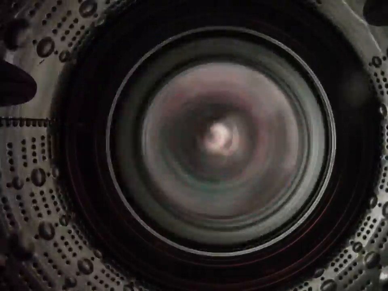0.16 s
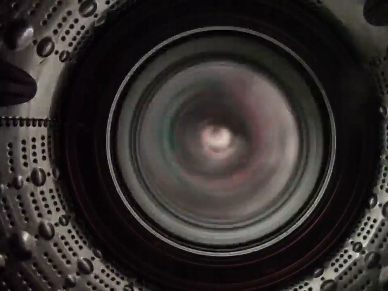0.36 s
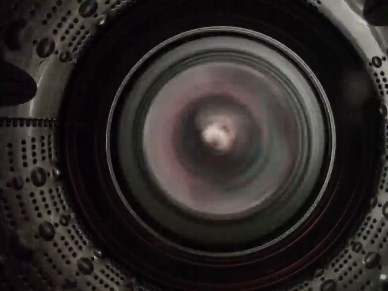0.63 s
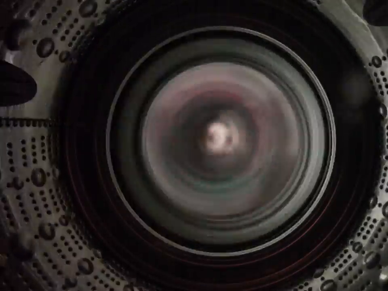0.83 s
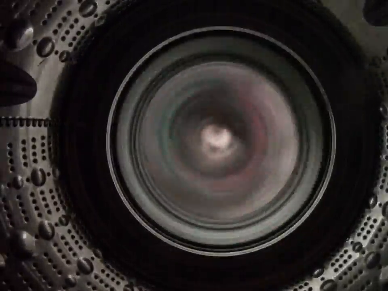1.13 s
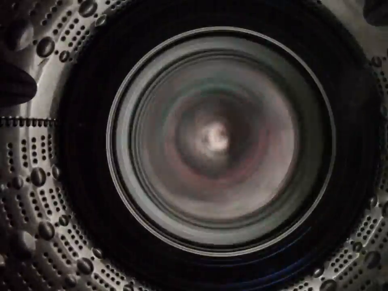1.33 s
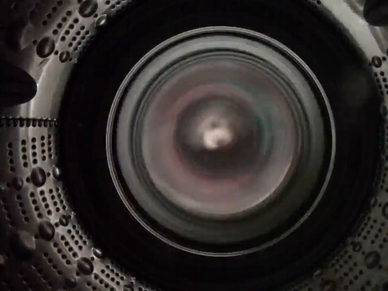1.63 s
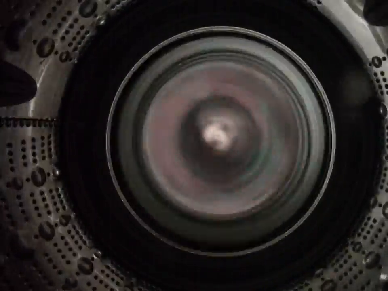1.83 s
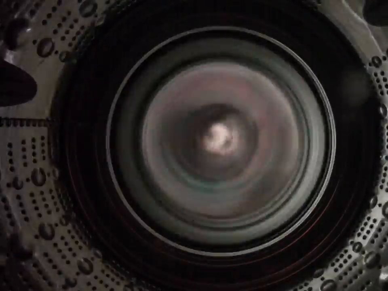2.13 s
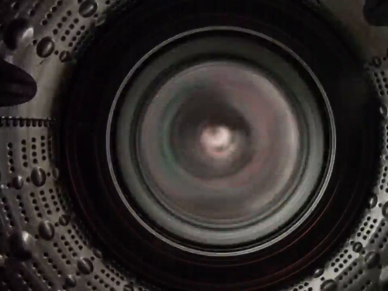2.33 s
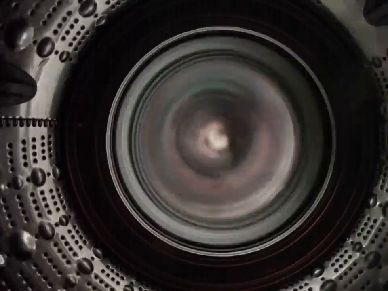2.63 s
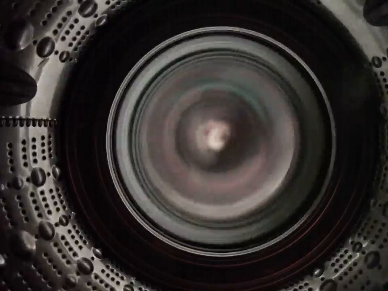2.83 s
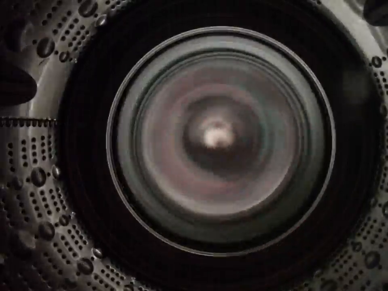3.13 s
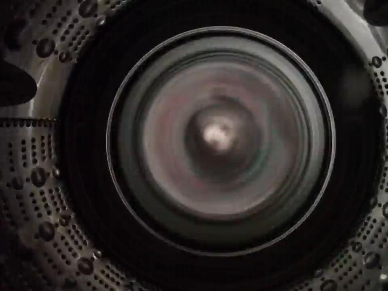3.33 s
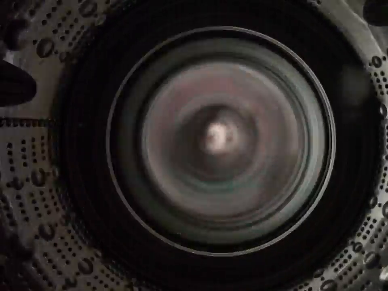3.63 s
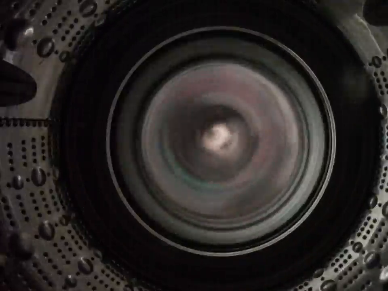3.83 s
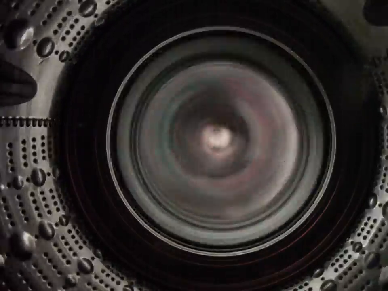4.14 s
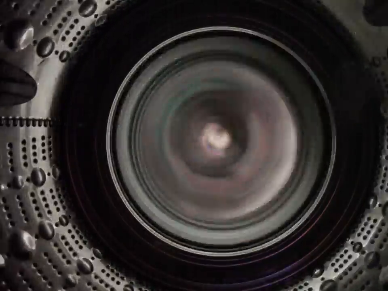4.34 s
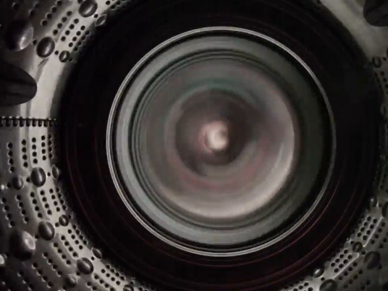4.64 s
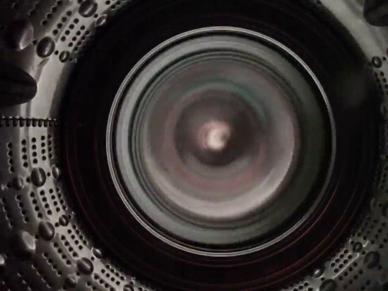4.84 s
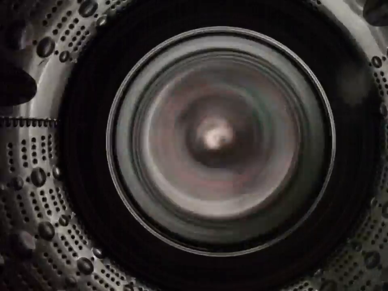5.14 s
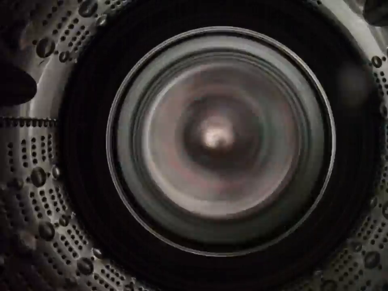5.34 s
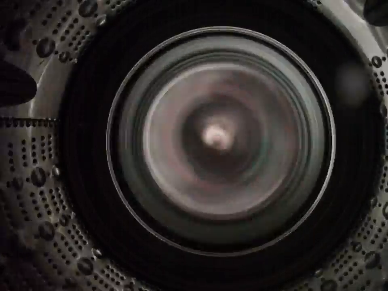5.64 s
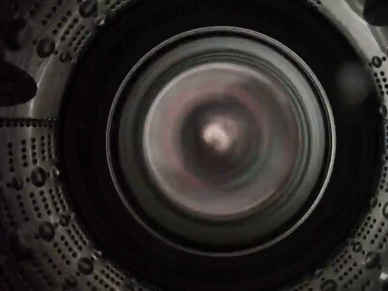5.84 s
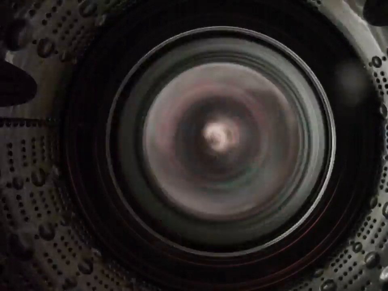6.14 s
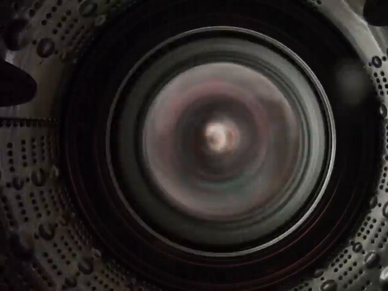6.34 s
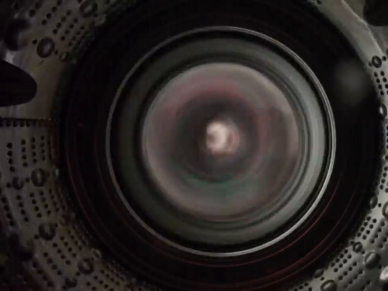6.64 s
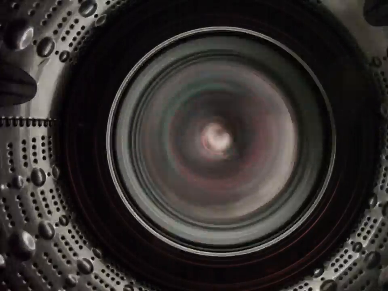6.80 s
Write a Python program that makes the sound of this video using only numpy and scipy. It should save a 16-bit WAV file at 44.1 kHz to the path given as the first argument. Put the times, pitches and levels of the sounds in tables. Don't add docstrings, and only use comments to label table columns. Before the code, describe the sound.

A washing machine drum is already spinning fast and slowly gaining speed, heard by a small microphone fixed inside. A heavy bass rumble flutters nine to ten times a second with dull tub thuds. A motor hum near 320 hertz and a fainter whine above it creep upward. Air rushes with a hollow metallic ring, and tiny water spatters tick now and then.

```python
import sys
import numpy as np
from scipy import signal
from scipy.fft import rfft, irfft
from scipy.io import wavfile
from scipy.ndimage import uniform_filter1d

SR = 44100
rng = np.random.default_rng(int(sys.argv[2]) if len(sys.argv) > 2 else 0)


def to_linear_factor(level_db):
    exponent = np.asarray(level_db, float) / 20
    return 10 ** exponent


def wav_record(signal):
    frames = np.transpose(np.atleast_2d(signal))
    bounded = np.clip(frames, -1, 1)
    quanta = np.round(bounded * 32767).astype(np.int16)
    wavfile.write(sys.argv[1], SR, quanta)


N = 307377
T = np.arange(N) / SR
HZ = np.arange(N // 2 + 1) * SR / N + 1e-3

# f/Hz, level/dB per Hz
AIR_RUSH = [(10, -83), (22, -74.5), (40, -63), (120, -61.5), (250, -67.5), (405, -71), (860, -86.5),
            (1500, -71.5), (2700, -83), (4400, -92), (6500, -101), (9000, -111), (11500, -113),
            (12700, -117), (15200, -121), (22050, -125)]
# f/Hz, level/dB rms
WHISTLES = [
    (14099, -104),
    (14739, -90.5),
]
# f/Hz, width/Hz, level/dB per Hz
PANEL_CABINET_MODES = [(62, 10, -51),
                       (99.5, 6.2, -48), (202.8, 55, -59), (235, 14, -61), (275.3, 7.9, -58.5), (314.6, 65, -55)]
# f/Hz, width/Hz, level/dB per Hz
SHELL_MODES = [(445.4, 19, -64), (525, 118, -65), (711, 212, -72.5), (947, 63, -71), (1047.4, 43, -63.5),
               (1157, 188, -68), (1404, 200, -66.5), (1543, 120, -70.5), (1693, 74, -70), (1818, 26, -65.5),
               (1872, 110, -68), (2068, 350, -70), (2308, 198, -72.5), (3203, 54, -80.5), (3645, 660, -89),
               (5000, 360, -90), (5600, 220, -95.5), (6350, 140, -99), (14100, 100, -116),
               (14760, 90, -113), (14500, 500, -117)]
# t/s, splash level/dB, mist level/dB, fade/s
FLUNG_DROPS = [(.05, -65, -72, 0.047), (1.285, -68, -80, 0.055), (2.8, -73, -78, 0.044),
               (3.231, -52, -59, 0.029), (3.363, -60, -81, 0.018), (3.47, -73, -78, 0.054),
               (4.024, -56, -67, .03), (5.03, -61, -81, 0.026), (5.75, -71, -79, 0.035),
               (5.992, -58, -74, 0.025), (6.36, -72, -69, 0.034)]
# f/Hz, level/dB per Hz
SPLASH_COLOUR = [(2000, -30), (4500, 0), (8500, -2), (10500, -20), (16000, -50)]
MIST_COLOUR = [(7000, -30), (9500, 0), (12400, 0), (13600, -18), (16000, -35)]

# top level/dB, f/Hz, width/Hz
SLOT_MULTIPLES = [32, -33, -34, -35, 36, 37, 38]
SLOT_PEAKS = [(-49, 291.8, 35.3), (-40, 300.9, 18.7), (-36.5, 312.3, 11), (-31.5, 315.2, 28),
              (-25, 307.2, 29.2), (-35.5, 348.6, 32.6), (-49, 347.4, 20)]
# multiples; top level/dB, f/Hz, width/Hz
WHINE_MULTIPLES = [-71, 72, -73, 74, 108, 143, 144, 145]
WHINE_PEAKS = [(-54.5, 570, 180), (-50, 626, 170), (-53.5, 740, 98), (-61, 714, 58), (-44.5, 1080, 39),
               (-55, 1382, 64), (-44, 1313, 100), (-52.5, 1388, 56)]
# multiples; top level/dB, f/Hz, width/Hz
BETWEEN_MULTIPLES = [-5.552, 6.552, 7.552]
BETWEEN_PEAKS = [
    (-41.5, 54.0, 4.1),
    (-28.5, 73, 57),
    (-29.9, 68.2, 9.8),
]
# t/s, level/dB
BETWEEN_SURGES = [(0, -3), (.7, 0), (1.1, 2), (1.6, -4.5), (2.2, -13), (2.8, 5.5), (3.1, -9), (3.4, 4.5),
                  (4, -8.5), (4.6, 5.5), (5.2, -10.5), (5.8, -2.5), (6.4, 3), (6.97, 4)]
# multiples; top level/dB, f/Hz, width/Hz
THUD_MULTIPLES = [14, 15, 16, 17, 18]
THUD_PEAKS = [(-13.5, 128.7, 22), (-4.5, 143.4, 8.8), (6.0, 161.8, 11.9), (0.5, 171.5, 17), (-7, 163.0, 12)]
# f/Hz, width/Hz, level/dB per Hz over the blow
TUB_MODES = [(155, 28, -23)]
# t/s, extra level/dB
HARD_LANDINGS = [(.04, -2.5), (.49, 3), (1.04, 6), (1.36, 7.5), (1.59, 2.5), (1.8, 8), (2.99, 2), (3.1, 3),
                 (3.92, 10), (4.15, 5), (5.08, 0), (5.91, 1), (6.31, 1), (6.81, 4)]
# multiples; top level/dB, f/Hz, width/Hz
KNOCK_MULTIPLES = [23, 25, 28, 29, 30, 47]
KNOCK_PEAKS = [(-41.5, 207.3, 22), (-47.5, 235.3, 12.3), (-46, 272.6, 12), (-49.5, 271.3, 10),
               (-36.5, 306.8, 34.6), (-50.5, 442, 88)]
# top level/dB, f/Hz, width/Hz
SWAY_PEAKS = [(-28.5, 10, 4.7), (-36.5, 30.1, 4.6)]
ROCK_PEAKS = [(-37, 39.5, 9), (-29.5, 48.9, 3.4)]
# multiples; top level/dB, f/Hz, width/Hz
LOAD_MULTIPLES = [6, 7, -8, -9, -10, -11, 12, 13]
LOAD_PEAKS = [(-19, 58.8, 4.5), (-20.3, 64.6, 41), (-42, 75.3, 11), (-40, 88.3, 5.2), (-39, 94.4, 8),
              (-44.5, 102.4, 8), (-49.5, 140, 48), (-48, 126.6, 13)]
# t/s, speed/turns per s
DRUM_SPEED = [
    (0, 8.981),
    (6.97, 9.881),
]


def curves(table):
    s, *columns = np.transpose(table)
    return [np.interp(T, s, c) for c in columns]


def noise(power):
    return irfft(rfft(rng.standard_normal(N)) * np.sqrt(power * SR / 2), N)


def sloped(points):
    hz, db = np.transpose(points)
    return to_linear_factor(np.interp(np.log(HZ), np.log(hz), db)) ** 2


def walk(rate):
    k = int(SR / rate)
    held = np.repeat(rng.standard_normal(N // k + 1), k)
    return 1.87 * uniform_filter1d(uniform_filter1d(held, k), k)[:N]


def ringing(modes, flicker_db):
    out = np.zeros(N)
    for hz, width, db in modes:
        skirt = (1 + (2 * (HZ - hz) / width) ** 2) ** 2
        out += to_linear_factor(flicker_db * walk(6)) * noise(to_linear_factor(db) ** 2 / skirt)
    return out


def tone(turn, multiple, db, lead):
    wave = np.cos(2 * np.pi * (abs(multiple) * turn + lead))
    return np.sign(multiple) * np.sqrt(2) * to_linear_factor(db) * wave


def multiples(turn, speed, at, peaks, wander_db, lead=0):
    out = np.zeros(N)
    for k, (db, hz, width) in zip(at, peaks):
        off_peak = 1 + (2 * (abs(k) * speed - hz) / width) ** 2
        out += tone(turn, k, db + wander_db * walk(3), lead) / off_peak
    return out


def door_sweep(turn):
    return np.cos(2 * np.pi * (turn - .86))


def air(turn, faster):
    level_db = -2.68 + 4 * faster + 0.77 * door_sweep(turn) + 0.62 * walk(8)
    return noise(sloped(AIR_RUSH)) * to_linear_factor(level_db)


def whistle():
    return sum(np.sqrt(2) * to_linear_factor(db + 3 * walk(30)) * np.sin(2 * np.pi * hz * T) for hz, db in WHISTLES)


def cabinet(turn):
    flex = np.cos(4 * np.pi * (turn - .17))
    return ringing(PANEL_CABINET_MODES, .5) * to_linear_factor(-0.5 + 2.5 * flex)


def shell(turn, faster):
    level_db = -0.2 + 2 * faster + 0.38 * door_sweep(turn) + 0.25 * walk(9)
    return ringing(SHELL_MODES, 0.89) * to_linear_factor(level_db)


def drops():
    splash, mist = noise(sloped(SPLASH_COLOUR)), noise(sloped(MIST_COLOUR))
    splash, mist = splash / splash.std(), mist / mist.std()
    out = np.zeros(N)
    for s, splash_db, mist_db, fade in FLUNG_DROPS:
        age = np.maximum(T - s, 0)
        envelope = np.minimum(age / 0.0052, 1) * np.exp(-age / fade)
        out += envelope * (to_linear_factor(splash_db) * splash + to_linear_factor(mist_db) * mist)
    return out


def motor(turn, speed, faster):
    lead = .2 + .33 * faster
    slots = multiples(turn + .05, speed, SLOT_MULTIPLES, SLOT_PEAKS, 0.94, lead)
    whine = multiples(turn, speed, WHINE_MULTIPLES, WHINE_PEAKS, 1.1)
    return slots + whine * to_linear_factor(0.66 * walk(25))


def between_tones(turn, speed, lead):
    surge_db = curves(BETWEEN_SURGES)[0]
    return to_linear_factor(surge_db) * multiples(turn - .085, speed, BETWEEN_MULTIPLES, BETWEEN_PEAKS, 1.2, lead)


def thuds(turn, speed):
    turn = turn - .38
    pre_swell = np.cos(2 * np.pi * (turn + .2))
    rattle = ringing(TUB_MODES, 0.39) * to_linear_factor(4.9 * pre_swell - 4 * (speed - speed.mean()))
    ring = multiples(turn, speed, THUD_MULTIPLES, THUD_PEAKS, 1.0)
    hard_db = sum(db * np.exp(-((T - s) / .035) ** 2) for s, db in HARD_LANDINGS)
    blow_db = -37 + hard_db + 1.2 * walk(9)
    return to_linear_factor(blow_db) * (ring + rattle)


def load_shake(turn, speed, lead):
    wander_db = .5
    sway = multiples(turn + .06, speed, [1, 3], SWAY_PEAKS, wander_db)
    rock = multiples(turn - .025, speed, [4, -5], ROCK_PEAKS, wander_db, .6 * lead)
    shake = multiples(turn - .2, speed, LOAD_MULTIPLES, LOAD_PEAKS, wander_db, lead)
    knock = multiples(turn - .4, speed, KNOCK_MULTIPLES, KNOCK_PEAKS, wander_db)
    return sway + rock + shake + knock


def scene():
    speed, = curves(DRUM_SPEED)
    turn = -.062 + np.cumsum(speed) / SR
    faster = speed - speed[0]
    lead = .38 - .42 * faster
    background = air(turn, faster) + whistle() + cabinet(turn) + shell(turn, faster)
    machine = motor(turn, speed, faster) + between_tones(turn, speed, lead)
    drum = thuds(turn, speed) + load_shake(turn, speed, lead)
    return (background + drops() + machine + drum)[None]


def band_limit(x):
    return signal.sosfilt(signal.butter(12, 15290, fs=SR, output="sos"), x)


def record(dry):
    mix = dry * np.minimum((T[-1] - T) / .004, 1)
    return band_limit(mix)


dry = scene()
out = record(dry)
wav_record(out)
```